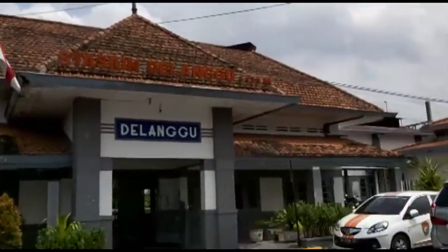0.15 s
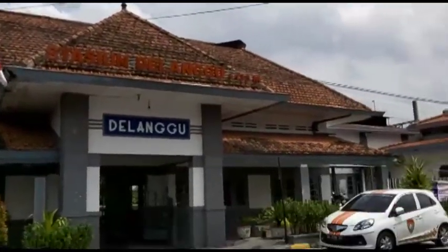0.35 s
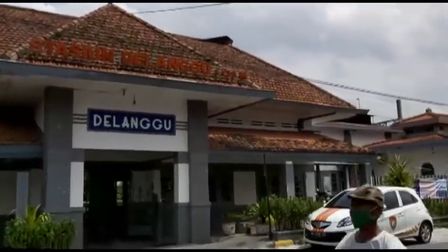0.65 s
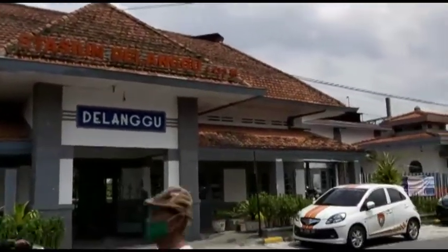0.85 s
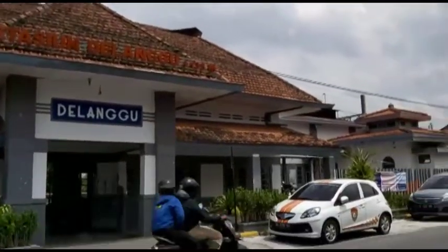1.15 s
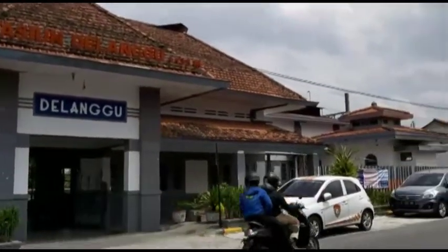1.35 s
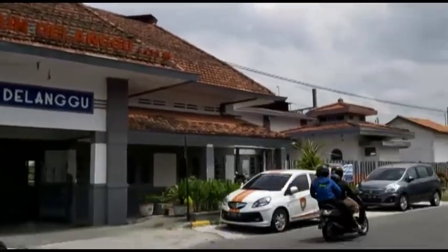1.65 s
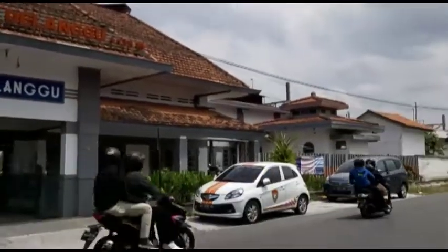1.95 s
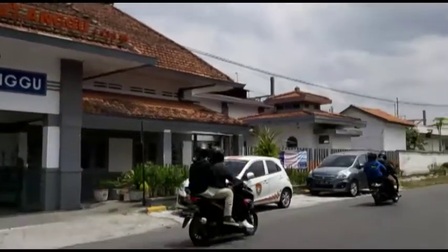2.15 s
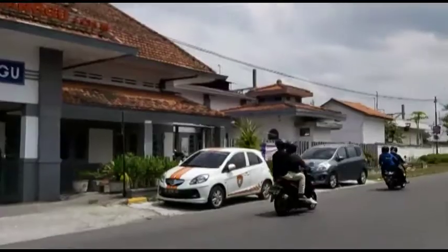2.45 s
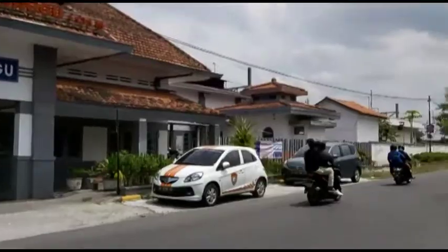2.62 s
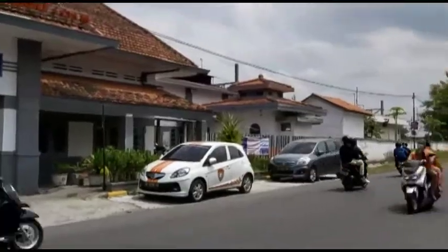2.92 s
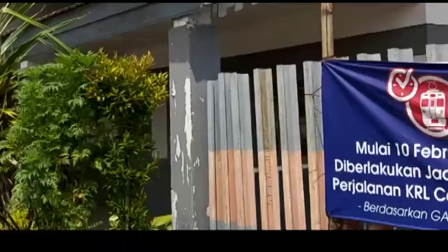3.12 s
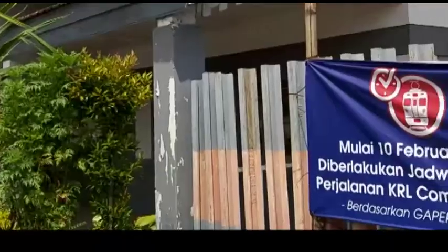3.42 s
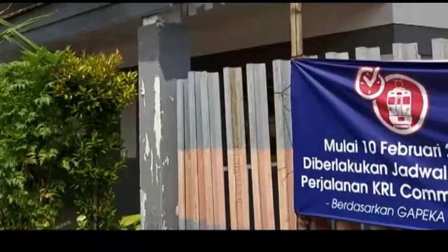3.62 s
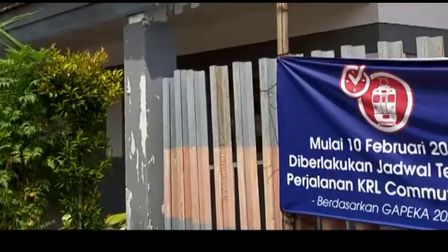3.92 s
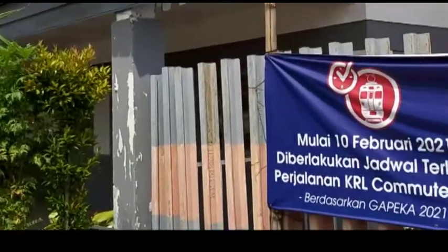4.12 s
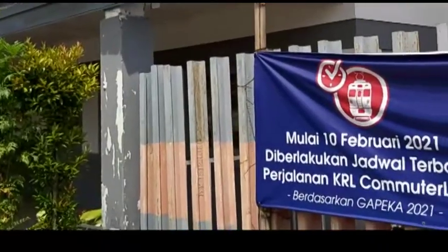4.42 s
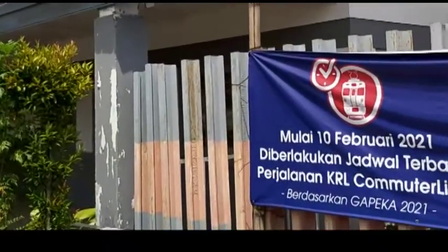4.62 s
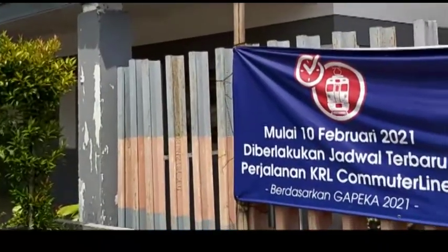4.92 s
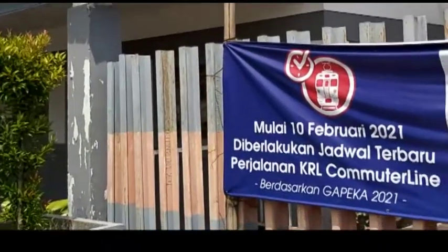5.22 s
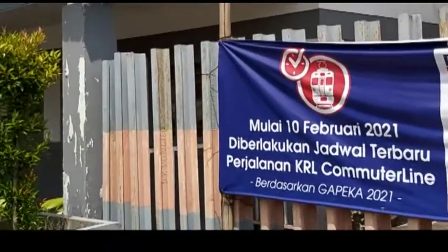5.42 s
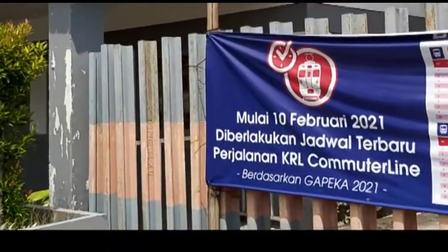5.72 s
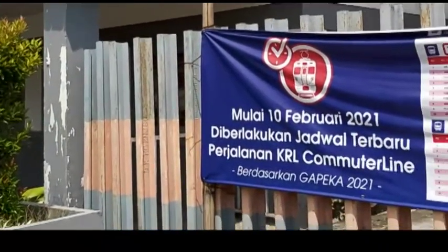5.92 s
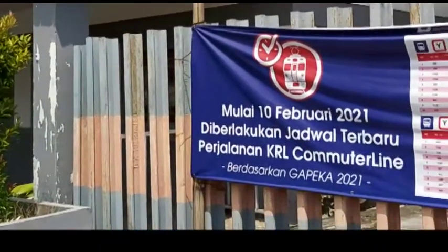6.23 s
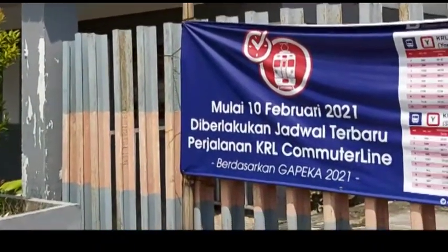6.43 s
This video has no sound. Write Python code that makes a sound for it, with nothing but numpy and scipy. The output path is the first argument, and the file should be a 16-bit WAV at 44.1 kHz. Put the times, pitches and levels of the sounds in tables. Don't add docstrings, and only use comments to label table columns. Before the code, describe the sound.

Close motorbike engines purr and rattle along a street for three seconds, then suddenly a much quieter, muffled deep idle and far-off road hum.

```python
import sys
import numpy as np
from scipy import signal
from scipy.fft import rfft, irfft, next_fast_len
from scipy.io import wavfile

SR = 44100
rng = np.random.default_rng(int(sys.argv[2]) if len(sys.argv) > 2 else 0)


def elevation(decibels):
    levels = np.asarray(decibels, float)
    return 10 ** (levels / 20)


def store_pcm(level_fs):
    pcm = np.round(np.clip(level_fs, -1, 1) * 32767).astype(np.int16)
    wavfile.write(sys.argv[1], SR, np.atleast_2d(pcm).T)


N = 289737
T = np.arange(N) / SR


def leaving_bike():
    # t/s, firings/Hz, level/dB
    course = [(.9, 45.3, -3), (1.25, 45, -1), (1.6, 44.4, 1.5), (1.9, 44, 2), (2.2, 43.7, 1.5),
              (2.5, 43.5, -2.5), (2.8, 43.3, -1), (3.07, 43.1, -3)]
    # order of the firing rate, level/dB rms
    note = [(1, -43), (2, -37), (3, -39), (4, -39), (5, -36), (6, -37), (7, -30), (8, -28.5), (9, -30.5),
            (10, -37), (11, -40), (12, -44), (13, -46), (14, -48), (16, -47), (18, -45)]
    return engine(course, note, waver_db=2.2, jitter=.002, lead_ms=.1, pan_db=-2.5)


def pulling_bike():
    # t/s, firings/Hz, level/dB
    course = [(0, 43.8, -4), (.2, 44.5, -2), (.4, 43.3, 0), (.65, 40.4, 1), (.9, 39.4, 0), (1.2, 39.5, 0),
              (1.5, 40.6, 2), (1.9, 40.7, -1.5), (2.7, 42, -2.5)]
    # order of the firing rate, level/dB rms
    note = [(1, -46.5), (2, -30.5), (3, -39.5), (4, -29), (5, -36.5), (6, -35.5), (7, -34.5), (8, -37),
            (10, -53.5)]
    return engine(course, note, waver_db=2.4, jitter=.005, lead_ms=.3, pan_db=-1.5)[0]


def arriving_bike():
    # t/s, firings/Hz, level/dB
    course = [(2, 35.7, -2.5), (2.3, 35.8, 0), (2.6, 34.4, 0), (2.85, 34.1, 1), (3.17, 34.8, 3)]
    # order of the firing rate, level/dB rms
    note = [(1, -50), (2, -30), (3, -36), (4, -37), (5, -40), (6, -41.5), (7, -32), (9, -65.5)]
    return engine(course, note, waver_db=-0.5, jitter=0.0047, lead_ms=0.11, pan_db=-1.0)[0]


def engine(course, note, waver_db, jitter, lead_ms, pan_db):
    firings, level_db = in_time(course)
    phase = 2 * np.pi * np.cumsum(firings * (1 + jitter * drift(7.3))) / SR
    lag = 2 * np.pi * firings * lead_ms / 1000
    to_edge = np.minimum(T - course[0][0] + .2, course[-1][0] + .2 - T)
    fade = np.clip(to_edge / .3, 0, 1)
    out, heard = np.zeros((2, N)), fade > 0
    ears = np.array([phase, phase - lag])[:, heard]
    for order, order_db in note:
        gain = elevation(order_db + waver_db * drift(2.8)[heard])
        out[:, heard] += gain * np.sin(order * ears + rng.uniform(0, 2 * np.pi))
    pan = elevation([[pan_db / 2], [-pan_db / 2]])
    return np.sqrt(2) * fade * elevation(level_db) * out * pan, phase


def ringing_casings(phase):
    # start t/s, end t/s, f/Hz, width/Hz, level/dB
    casings = [(0, .55, 1200, 90, -42), (.3, 1.1, 3700, 150, -44), (.2, 1.0, 2885, 170, -44),
               (.55, .85, 1960, 90, -40), (.7, 1.25, 955, 90, -38), (.6, 1.6, 4200, 300, -45),
               (1.3, 1.55, 1555, 70, -38), (1.2, 2.1, 2210, 120, -40), (1.35, 2.1, 1850, 80, -42),
               (1.6, 2.2, 4450, 500, -41), (1.65, 2.05, 3300, 700, -41), (1.4, 3.3, 780, 200, -35),
               (2.15, 3.1, 2045, 60, -41), (2.4, 3.3, 4275, 300, -49), (1.35, 2.15, 7425, 450, -46),
               (2.1, 3.3, 7600, 700, -48), (1.02, 1.25, 11800, 1500, -48)]
    throb = 1 + 0.41 * np.cos(phase) ** 3
    return ringing(casings, throb, alike=0.12, lead_ms=.48, fall=.012)


def ringing(rows, pulse, alike, lead_ms, fall):
    out, lead = np.zeros((2, N)), round(lead_ms * SR / 1000)
    for start, end, hz, width_hz, level_db in rows:
        span = slice(max(round(start * SR), 0), min(round(end * SR), N))
        part = (T[span] - start) / (end - start)
        level_db = level_db + 1.7 * drift(12.0)[span]
        r = np.exp(-np.pi * 1.4 * width_hz / SR)
        white = rng.standard_normal((2, 3, len(part) + lead))
        slow = signal.lfilter([1], [1, -2 * r, r * r], white[0] + 1j * white[1])
        shared, left, right = rms_one(slow.view(float)).view(complex)
        turn = np.exp(2j * np.pi * np.cumsum(hz * (1 + fall * (.5 - part))) / SR)
        late = shared[:len(part)] * np.exp(-2j * np.pi * hz * lead / SR)
        common = np.array([shared[lead:], late])
        own = np.array([left, right])[:, lead:]
        pair = np.sqrt(alike) * common + np.sqrt(1 - alike) * own
        swell = np.sqrt(np.sin(np.pi * part))
        out[:, span] += elevation(level_db) * swell * pulse[span] * np.real(pair * turn)
    return out


def loose_parts():
    # t/s, peak level/dB, f/Hz
    ticks = [(0.6394, -28, 8890), (0.6994, -26, 7040), (0.7302, -25, 7660), (0.9044, -25, 7200),
             (0.9144, -26, 11500), (0.9722, -24, 9520), (1.1444, -26, 7380), (1.2141, -24, 6820),
             (1.286, -24, 7190), (1.3578, -24, 7180), (2.7636, -25, 7510)]
    # t/s, peak level/dB, f/Hz, length/s
    squeaks = [
        (.01, -38, 12150, .02),
        (.508, -34, 11850, .016),
        (.772, -19, 11900, .014),
        (.792, -27, 12050, .008),
        (.815, -27, 2850, .03),
        (1.092, -39, 11800, .01),
        (1.195, -38, 12100, .008),
    ]
    out, t = np.zeros((2, N)), np.arange(2048) / SR
    decay = elevation(-60 * t / .02)
    onset = np.minimum(t / .001, 1)
    for s, peak_db, hz in ticks:
        noise = rng.standard_normal((2, len(t)))
        crack = resonate(noise, 9500, 6030) + 2.5 * resonate(noise, hz, 1500)
        i = round(s * SR)
        out[:, i:i + len(t)] += elevation(peak_db - 2) * crack * decay * onset
    for s, peak_db, hz, length in squeaks:
        i = round(s * SR)
        swell = np.sin(np.pi * np.minimum(t / length, 1)) ** 2
        out[:, i:i + len(t)] += elevation(peak_db) * swell * np.sin(2 * np.pi * hz * t) * elevation([[-3], [3]])
    return out


def near_road():
    # t/s, level/dB
    nearness = [(0, -4.5), (.3, -3), (.65, -1), (.87, 0), (1.2, -1.5), (1.6, 0.5), (1.85, -0.85),
                (2.15, -1), (3.07, -2.5)]
    # low f/Hz, high f/Hz, level/dB, share of the nearness, drift/(dB/s) as the bikes turn away
    layers = [
        (60, 1200, -17.0, 0.36, -2.2),
        (500, 5100, -25.5, 0.65, 1.04),
        (2790, 6000, -34.0, .95, -0.6),
        (6000, 10100, -38.0, 1.5, -0.17),
    ]
    # f/Hz, level/dB per Hz
    colour = [(15, -60.5), (25, -26), (43, -19.5), (56, -23), (75, 2), (110, -3.5), (165, -1), (194, -7.5),
              (307, -0.5), (570, -14.5), (1060, -16), (2080, -17.5), (5340, -31), (12000, -36.5),
              (15700, -42)]
    # f/Hz, left-right likeness, lead of the left ear/ms
    ears = [(49.1, 0.78, 0.4), (203, 1, .1), (407, 0.56, 0.085), (825, 0.91, 0.22), (1650, 0.2, 0.43),
            (3500, 0.18, 0.476), (9000, .06, 0.42)]
    # f/Hz, left minus right level/dB
    balance = [(60, -5), (150, -1.5), (380, -1.5), (950, -1.5), (2380, 0.0), (5980, 0.5), (15000, -4.5)]
    return traffic(nearness, layers, colour, ears, balance, flicker_db=.7, swell_db=.4)


def traffic(nearness, layers, colour, ears, balance, flicker_db, swell_db):
    first, last = nearness[0][0], nearness[-1][0]
    span = slice(max(round(first * SR) - 2048, 0), round(last * SR) + 2048)
    near_db, since = in_time(nearness)[0][span], T[span] - first
    size = next_fast_len(len(since))
    hz = np.maximum(np.arange(size // 2 + 1) * SR / size, 1)

    shared, left, right = rfft(rng.standard_normal((3, size)))
    alike = np.clip(at_hz(ears, hz), 0, 1)
    late = np.exp(-2j * np.pi * hz * at_hz(ears, hz, column=2) / 1000)
    tilt = elevation(at_hz(balance, hz) / 2)
    pair = np.array([np.sqrt(alike) * shared + np.sqrt(1 - alike) * left,
                     np.sqrt(alike) * shared * late + np.sqrt(1 - alike) * right])
    pair = pair * elevation(at_hz(colour, hz)) * [tilt, 1 / tilt]

    mid_power = np.abs(pair.mean(axis=0)) ** 2 * 2 / size ** 2
    gains_db, places = [], []
    for low, high, level_db, share, slope in layers:
        layer_power = mid_power[(hz > low) & (hz < high)].sum()
        gains_db.append(level_db + share * near_db + slope * since - 10 * np.log10(layer_power))
        places.append(np.log(np.sqrt(low * high)))

    centres = np.arange(np.log2(colour[0][0]), np.log2(colour[-1][0]) + .5, .5)
    swells = [drift(10.0)[span] for k in range(len(centres) // 3 + 2)]
    out = np.zeros((2, N))
    for k, centre in enumerate(centres):
        window = np.cos(np.pi * np.clip(np.log2(hz) - centre, -.5, .5)) ** 2
        place = np.interp(centre * np.log(2), places, np.arange(len(places)))
        lower = min(int(place), len(places) - 2)
        gain_db = gains_db[lower] + (place - lower) * (gains_db[lower + 1] - gains_db[lower])
        gain_db = gain_db + swell_db * swells[k // 3] + flicker_db * drift(25.0)[span]
        out[:, span] += elevation(gain_db) * irfft(pair * window, size)[:, :len(since)]
    return out


def kerb():
    leaving, phase = leaving_bike()
    bikes = leaving + pulling_bike() + arriving_bike()
    return bikes + elevation(-1.5) * near_road() + elevation(4.5) * ringing_casings(phase) + loose_parts()


def idling_lorry():
    # t/s, firings/Hz, level/dB
    course = [(3.08, 8.3, -27), (3.8, 8.3, -24), (4.1, 8.3, -26), (4.75, 8.3, -26.5), (5.25, 8.3, -22.5),
              (5.7, 8.25, -28), (6.1, 8.2, -27), (6.57, 8.2, -30.5)]
    # order of the firing rate, level/dB rms
    note = [(2, -3), (3, -4), (4, -9), (5, -10), (6, -17), (7, -12), (8, -13), (9, -16), (11, -18),
            (12, -19)]
    return engine(course, note, waver_db=3, jitter=.012, lead_ms=1.1, pan_db=-1.5)[0]


def far_engines():
    # t/s, firings/Hz, level/dB
    low_course = [(3.08, 32.6, -6), (3.4, 34.6, 1), (3.7, 35.5, 2), (4, 33.1, -2), (4.4, 32.5, -1)]
    # order of the firing rate, level/dB rms
    low_note = [(2, -39), (4, -47.5), (6, -61.5)]
    # t/s, firings/Hz, level/dB
    high_course = [(5.4, 46.6, -12), (5.7, 46.9, -6), (5.9, 46.4, -3), (6.2, 46.05, 1.5), (6.67, 46.4, 3)]
    # order of the firing rate, level/dB rms
    high_note = [(2, -50), (4, -47), (6, -58), (8, -59), (10, -50), (12, -51), (20, -62)]
    low, _ = engine(low_course, low_note, waver_db=-1.5, jitter=0.0043, lead_ms=0.81, pan_db=-1.0)
    high, _ = engine(high_course, high_note, waver_db=1.5, jitter=.001, lead_ms=.3, pan_db=-1.5)
    return low + high


def gear_whine():
    # t/s, f/Hz, level/dB
    course = [
        (5.84, 1030, -68),
        (5.88, 1029, -51),
        (5.98, 1016, -65),
        (6.31, 1018, -63),
        (6.38, 1016, -51),
        (6.57, 1014, -49),
    ]
    return engine(course, [(1, 0)], waver_db=1.5, jitter=.001, lead_ms=1.9, pan_db=-1.5)[0]


def far_road():
    # t/s, level/dB
    nearness = [(3.08, 1), (3.45, -2), (3.9, -4), (4.6, -6), (5.4, -8), (6.57, -4.5)]
    # low f/Hz, high f/Hz, level/dB, share of the nearness, drift/(dB/s)
    layers = [
        (12, 140, -34, .05, -0.5),
        (50, 200, -34, .01, -1.5),
        (193, 1400, -41.5, 0.44, -0.35),
        (1205, 5000, -51.5, 1, 0.08),
    ]
    # f/Hz, level/dB per Hz
    colour = [(7, -25), (12, 6), (34, -11.5), (80, -20), (120, -26.5), (250, -32), (560, -36), (800, -40),
              (1400, -44.5), (1900, -47.5), (2250, -52.5), (3400, -59.5), (3800, -65), (5100, -66)]
    # f/Hz, left-right likeness, lead of the left ear/ms
    ears = [(35, 0.63, 1.1), (100, 0.8, 0.53), (280, 0.3, 1.54), (800, 0.1, 1.86), (1800, 0.1, 1.5),
            (4010, .05, 2.5)]
    # f/Hz, left minus right level/dB
    balance = [(60, -3.5), (150, 1), (380, -4.5), (950, -1), (2380, -3), (5980, -1.5), (15000, -2)]
    return traffic(nearness, layers, colour, ears, balance, flicker_db=.6, swell_db=.4)


def ringing_hollows():
    # f/Hz, width/Hz, level/dB
    hollows = [(461, 140, -48), (1794, 200, -60), (2800, 210, -65.5), (3320, 153, -76.5), (4900, 82, -74)]
    rows = [(2.5, 7.5, *row) for row in hollows]
    return ringing(rows, np.ones(N), alike=.15, lead_ms=1.7, fall=0)


def shelter():
    sound = idling_lorry() + far_engines() + gear_whine() + elevation(3) * far_road() + ringing_hollows()
    return signal.sosfilt(signal.cheby2(24, 60, 5060, fs=SR, output="sos"), sound)


def in_time(rows):
    s, *columns = np.transpose(rows)
    return [np.interp(T, s, c) for c in columns]


def at_hz(points, hz, column=1):
    points = np.array(points)
    return np.interp(np.log(hz), np.log(points[:, 0]), points[:, column])


def rms_one(x):
    return x / np.sqrt(np.mean(x ** 2) + 1e-20)


def drift(rate):
    step, settle = 64, 1500
    r = np.exp(-2 * step * np.pi * rate / SR)
    white = rng.standard_normal(N // step + settle + 2)
    slow = signal.lfilter([1], [1, -2 * r, r * r], white)[settle:]
    return np.interp(np.arange(N) / step, np.arange(len(slow)), rms_one(slow - slow.mean()))


def resonate(x, hz, width_hz):
    r = np.exp(-np.pi * width_hz / SR)
    poles = [1, -2 * r * np.cos(2 * np.pi * hz / SR), r * r]
    return signal.lfilter([(1 - r * r) / 2, 0, (r * r - 1) / 2], poles, x)


def scene():
    after = np.clip((T - 3.071) / .004 + .5, 0, 1)
    return (1 - after) * kerb() + after * shelter()


def roll_off(x):
    return signal.sosfilt(signal.butter(12, 15840, fs=SR, output="sos"), x)


def record(dry):
    mix = signal.sosfilt(signal.cheby2(20, 70, 15990, fs=SR, output="sos"), dry)
    return roll_off(mix)


dry = scene()
out = record(dry)
store_pcm(out)
```